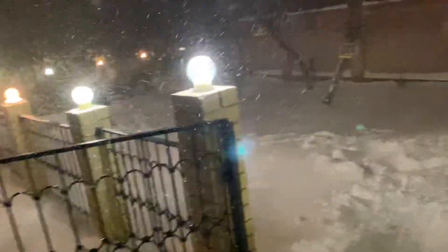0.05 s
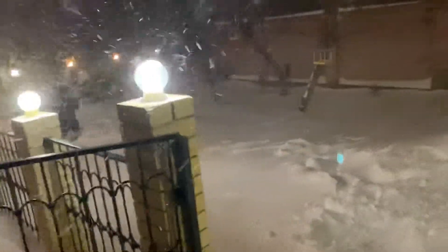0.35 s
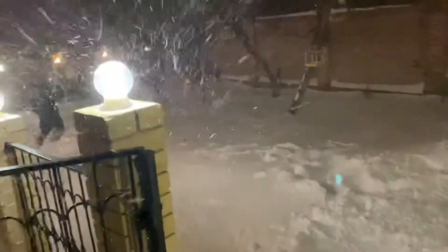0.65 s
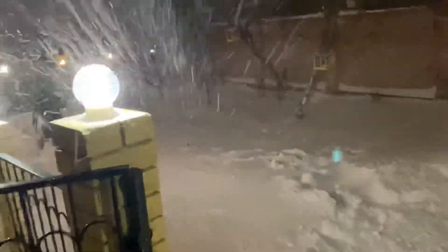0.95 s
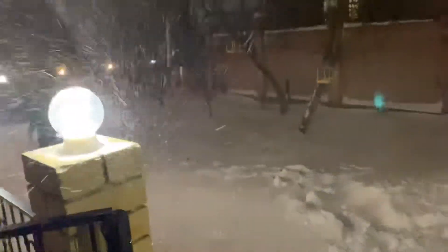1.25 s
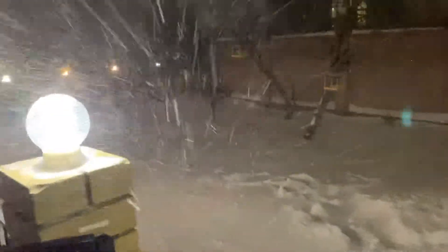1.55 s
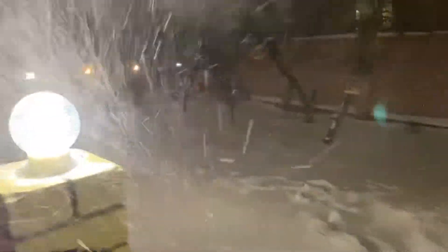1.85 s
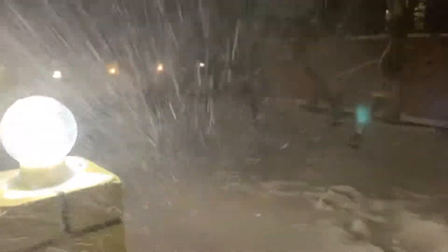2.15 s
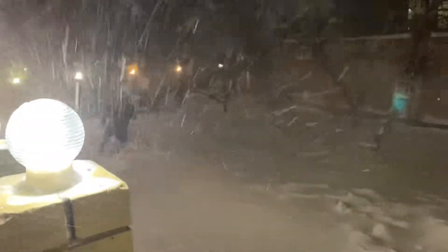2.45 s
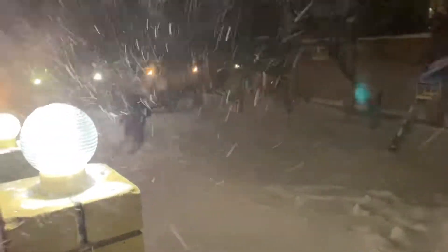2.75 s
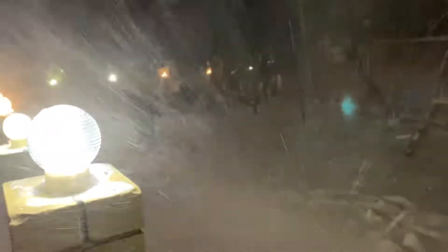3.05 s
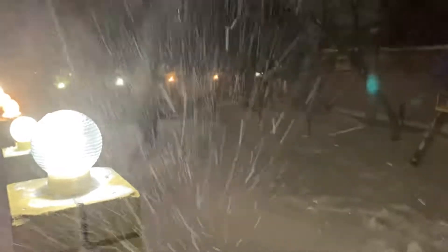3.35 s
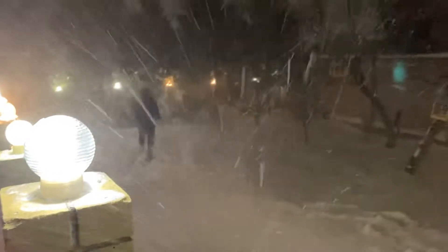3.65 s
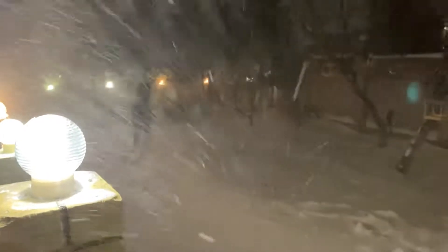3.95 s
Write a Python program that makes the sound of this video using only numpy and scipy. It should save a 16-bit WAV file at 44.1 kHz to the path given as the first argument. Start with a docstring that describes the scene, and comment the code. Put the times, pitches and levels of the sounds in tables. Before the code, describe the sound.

Wind buffets a hand-held microphone outdoors in a snowstorm. It starts as a low rumble with a few thumps, then builds into rapid, rasping gusts that ease near the end. Blowing snow hisses faintly behind.

```python
"""Snowstorm gusts blow across the two microphone openings (ports) of a hand-held recorder outdoors.
Slow swirls of air (eddies) rumble, and gusts strike in throaty, rasping bursts.
Single eddies slap and thump the ports. Driven snow hisses over the far storm,
one flake ticks on the case, and a limiter holds down the hardest jolts."""
import sys
import numpy as np
from scipy import signal
from scipy.fft import rfft, irfft
from scipy.io import wavfile
from scipy.ndimage import uniform_filter1d, minimum_filter1d, map_coordinates

SR = 44100
rng = np.random.default_rng(int(sys.argv[2]) if len(sys.argv) > 2 else 0)


def pcm_store(signal):
    """Save signal as 16-bit PCM."""
    levels = np.round(np.clip(np.atleast_2d(signal), -1, 1) * 32767)
    wavfile.write(sys.argv[1], SR, levels.astype(np.int16).T)


N = 176400

STRONG_RUSH_DB, STRONG_TREBLE_DB, STRONG_RUMBLE_DB = -21, -38, -18  # what counts as a strong gust
RUMBLE_EDGE_HZ, RUSH_EDGE_HZ = 51, 294  # the rumble hands over to the rush between these
PORT_LAG_S = 0.00024  # the left port feels an eddy this much later
SHADE_HZ = 1720  # the case shades the far port above this
LEFT_MINUS_RIGHT = np.array([[.5], [-.5]])  # splits a level difference between the ports


def wind():
    """Gusts drive eddies across the ports: big ones rumble, middling ones rush, fine ones rasp."""
    # How loud the rumble is. Each row: time in seconds, level in dB.
    rumble_levels = [(0.02, -29), (0.27, -41.5), (0.37, -24), (0.45, -45), (0.47, -25.5), (0.64, -18),
                     (0.69, -30), (0.73, -16), (1.03, -24), (1.09, -20), (1.19, -28.5), (1.22, -16),
                     (1.96, -15), (1.99, -22), (2.17, -22.5), (2.26, -12.5), (2.31, -26), (2.7, -22),
                     (2.86, -14), (3.27, -17.5), (3.95, -25)]
    # The tone of the eddies in a strong gust. Each row: frequency in Hz, level in dB.
    eddy_colour = [(25, -9), (35, -55), (50, 14.5), (110, 12), (200, 3.5), (400, 1.5), (750, 0), (1100, -5),
                   (1500, -11), (2100, -19), (3000, -34), (6400, -47)]
    flutter_db = 2.03 * smooth_random(per_s=68)
    rush_db, treble_db = gusts()
    rumble_db = over_time(rumble_levels) - STRONG_RUMBLE_DB - 1.5
    out = np.array([vortices(rush_db), vortices(rush_db)])
    swarm = eddies()
    for hz in 25 * 2 ** (np.arange(17) / 2):
        flow_share = over_pitch([(RUMBLE_EDGE_HZ, 0), (RUSH_EDGE_HZ, 1)], hz)
        treble_share = over_pitch([(650, 0), (1850, 1)], hz)
        gust_db = (1 - treble_share) * rush_db + treble_share * treble_db - 1
        flow_db = gust_db + flutter_db + 2.2 * smooth_random(per_s=55)  # each band also flickers alone
        band_db = STRONG_RUSH_DB + flow_share * flow_db + (1 - flow_share) * rumble_db
        side_db = LEFT_MINUS_RIGHT * 0.5 * min(hz / SHADE_HZ, 1)  # the left catches more fine eddies
        colour = undb(over_pitch(eddy_colour, hz) + side_db) * np.sqrt(hz / 1300)
        out = out + colour * undb(band_db) * half_octave(swarm, hz)
    return out


def gusts():
    """Each gust strikes, holds and eases off. Gives rush and treble in dB, where 0 is a strong gust."""
    # The gusts. Each row: start in seconds, hold in seconds, rush level in dB, treble level in dB.
    strikes = [(.315, 0.079, -27, -68), (0.492, 0.067, -27.5, -59.5), (.6, 0.085, -25.5, -53.5),
               (0.791, .11, -22.5, -38.5), (0.957, 0.034, -22.5, -39.5), (1.043, 0.046, -19, -37.5),
               (1.15, 0.084, -27.5, -42.5), (1.34, 0.12, -16.5, -31.5), (1.481, .04, -19.5, -37.5),
               (1.586, 0.083, -22, -39), (1.738, 0.017, -19.5, -36), (1.88, .13, -23, -40.5),
               (2.081, .075, -22, -53.5), (2.218, 0.049, -18, -37.5), (2.411, 0.019, -19, -40),
               (2.469, 0.025, -20, -31), (2.532, 0.072, -23.5, -36), (2.617, 0.025, -18, -38.5),
               (2.737, 0.12, -19, -33.5), (2.917, 0.0413, -17.5, -32), (3.02, 0.036, -18.5, -35.5),
               (3.088, 0.031, -16, -30), (3.182, 0.051, -20.5, -34.5), (3.29, 0.071, -20, -35.5),
               (3.422, .015, -20, -35), (3.526, 0.081, -28, -50), (3.713, 0.063, -26.5, -50.5),
               (3.892, 0.073, -23, -44.5)]
    # The wind between gusts. Each row: time in seconds, rush level in dB, treble level in dB.
    lull = [(.22, -54.5, -86), (.45, -39.5, -73), (.75, -27.5, -45.5), (1.3, -28, -49.5), (2.38, -31, -52),
            (2.9, -25.5, -41.5), (3.4, -25.5, -45), (3.48, -35, -50.5), (3.83, -39.5, -64), (4, -34, -62.5)]
    rise_db_per_s, fall_db_per_s = 649.5, 340
    t = np.arange(N) / SR
    rush_db, treble_db = over_time(lull, column=1), over_time(lull, column=2)
    for start, hold, top_rush_db, top_treble_db in strikes:
        strength = undb(top_rush_db - STRONG_RUSH_DB)  # weaker gusts swell more slowly
        before_db = rise_db_per_s * strength * np.maximum(start - t, 0)
        after_db = fall_db_per_s * np.maximum(t - start - hold, 0)
        rush_db = np.maximum(rush_db, top_rush_db - before_db - after_db)
        treble_db = np.maximum(treble_db, top_treble_db - before_db - after_db)
    return rush_db - STRONG_RUSH_DB, treble_db - STRONG_TREBLE_DB


def eddies():
    """A swarm of tiny, ragged pressure jolts, partly shared by the two ports. Gives their spectrum."""
    # How much of the swirling both ports feel. Each row: frequency in Hz, share from 0 to 1.
    shared_by_ports = [(40, 0.88), (200, 0.57), (700, 0.43), (3000, 0)]
    eddies_per_s, spread_db, decay_s, smooth_share = 480, 15, .0014, .24
    f = np.arange(1, N // 2 + 2) * SR / N
    sizes = (rng.random(N) < eddies_per_s / SR) * undb(-spread_db * rng.random(N))
    power = signal.lfilter([1], [1, -np.exp(-2 / (decay_s * SR))], sizes ** 2)  # each jolt dies away
    loudness = np.sqrt(power / power.mean() + smooth_share)
    right, left_only = rfft(rng.standard_normal((2, N)) * loudness)
    shared = np.clip(over_pitch(shared_by_ports, f), 0, 1)
    left = shared * right + np.sqrt(1 - shared ** 2) * left_only
    lag_s = PORT_LAG_S + 0.00064 / (1 + (f / 310) ** 2)  # the left lags more in the bass
    left *= np.exp(-2j * np.pi * f * lag_s)
    return np.array([left, right]) * late_bass(f, cycles=0.6)


def vortices(rush_db):
    """Little whirls peel off a port's rim: a hollow, unsteady note that climbs as the wind grows."""
    centre_hz, db_per_octave, wander_octaves = 563, 22, .55
    hz = centre_hz * 2 ** (rush_db / db_per_octave + wander_octaves * smooth_random(per_s=28))
    wobble = smooth_random(per_s=110) + 1j * smooth_random(per_s=110)  # blurs the note into a band
    note = np.real(wobble * np.exp(2j * np.pi * np.cumsum(hz) / SR))
    return undb(rush_db - 27) * note / np.hypot(1, hz / (2 * centre_hz))  # high notes are softer


def buffets():
    """One eddy hits the ports: a jolt with a ragged wake. The treble cracks, then the bass thumps."""
    # Single hits. Each row: time in seconds, strength in dB, frequency in Hz above which it fades,
    # and left minus right level of the treble in dB.
    hits = [(0.111, -17, 332, 5), (0.174, -17.5, 172, -2), (0.358, -1.5, 228, 0), (0.462, -5.5, 270, 0),
            (.493, -4, 260, -3), (0.608, -6.5, 800, 11), (.621, 3.5, 282, 10), (.675, -7.5, 1390, 8),
            (0.717, 3, 1570, 11), (0.732, 0, 880, -1), (1.088, 4, 525, 4), (1.402, -0.5, 1100, 0.5),
            (1.661, 0, 2350, 0), (1.871, -2, 1381, -18), (1.906, -10.5, 1476, -27), (2.083, -10.5, 865, -4),
            (2.168, 6, 1432, 6), (2.183, -2.5, 1478, 24), (2.221, -14.5, 3060, 19), (2.241, -1, 1230, 27),
            (2.49, -1, 2500, 12), (2.533, -7, 2330, -14), (2.604, -3.5, 1933, 8), (2.628, 2, 570, -5),
            (2.962, -11.5, 2676, 14.5), (3.048, -3, 1610, 20), (3.087, -11.5, 2129, 10), (3.114, 3, 800, 2),
            (3.208, -6, 2130, -12), (3.239, -1, 3260, 17), (3.309, -9, 2812, 17), (3.432, 6, 1180, 20.5),
            (3.444, -5, 3500, 2), (3.501, -5, 1754, 0), (3.712, -5, 1048, 20)]
    bass_hz, bass_slope, edge_slope = 85, 0.9, 3.29
    wake_decay_s, wake_strength = 0.0018, 1.44
    size = 8192
    f = np.arange(1, size // 2 + 2) * SR / size
    wake = np.exp(-np.arange(size) / SR / wake_decay_s)
    wake *= wake_strength / np.sqrt(np.sum(wake ** 2))
    body = (bass_hz / f) ** bass_slope / np.sqrt(1 + (bass_hz / f) ** 6)  # a hump in the bass
    body = body * late_bass(f, cycles=0.806) * SR / (2 * np.pi * bass_hz)
    treble_share = f ** 2 / (f ** 2 + SHADE_HZ ** 2)
    lead, fade = size // 8, signal.windows.tukey(size, .2)
    out = np.zeros((2, N + size))
    for start, db, edge_hz, side_db in hits:
        clean_jolt = np.exp(2j * np.pi * rng.random())
        jolt = clean_jolt + rfft(wake * rng.standard_normal((2, size))) * f / (f + RUSH_EDGE_HZ)
        jolt[0] *= np.exp(-2j * np.pi * f * PORT_LAG_S)
        gain = undb(db + 3 + LEFT_MINUS_RIGHT * side_db * treble_share)
        gain /= np.sqrt(1 + (f / edge_hz) ** (2 * edge_slope))
        thump = irfft(jolt * body * gain, size)
        i = int(start * SR) - lead
        out[:, i:i + size] += np.roll(thump, lead, axis=1) * fade
    return out[:, :N]


def flake_tick():
    """An icy flake strikes the case near the right port."""
    start_s, ring_hz, decay_s = .3755, 4330, 0.0017
    age = np.arange(N) / SR - start_s
    ring = hiss(ring_hz) + 0.18 * hiss(1.44 * ring_hz)
    return ring * (age > 0) * np.exp(-np.abs(age) / decay_s) * undb([[-33.5], [-28.5]])


def snow():
    """Driven snow hisses louder as a cloud of it passes, over the even rush of the far storm."""
    # How loud the blowing snow is. Each row: time in seconds, level in dB.
    snow_levels = [(0, -85), (.5, -76.5), (.95, -71.5), (1.5, -58), (2.15, -63.5), (2.8, -67),
                   (3.45, -71.5), (3.8, -62), (4, -68)]
    # The tone of the blowing snow. Each row: frequency in Hz, level in dB.
    snow_colour = [(2000, 1), (4500, 2), (7000, 3.5), (11000, -.5), (16000, -3.5)]
    # The tone of the far storm. Each row: frequency in Hz, level in dB.
    storm_colour = [(350, 0), (2200, 11), (4000, 7), (10000, -3)]
    cloud_db, storm_db = over_time(snow_levels) + 2.5, -68.5
    out = 0
    for hz in 350 * 2 ** (np.arange(12) / 2):
        flicker_db = .4 * smooth_random(per_s=42)
        near = undb(cloud_db + over_pitch(snow_colour, hz) + flicker_db)
        far = undb(storm_db + over_pitch(storm_colour, hz))
        out = out + np.hypot(near, far) * np.sqrt(hz / 7000) * hiss(hz)
    return out


def undb(db):
    """Turns decibels into a number to multiply by."""
    return 10 ** (np.asarray(db) / 20)


def over_time(table, column=1):
    """One column of a table, joined by straight lines in time."""
    rows = np.array(table)
    return np.interp(np.arange(N) / SR, rows[:, 0], rows[:, column])


def over_pitch(table, hz):
    """Reads a table at a frequency, with the octaves evenly spaced."""
    rows = np.array(table)
    return np.interp(np.log(hz), np.log(rows[:, 0]), rows[:, 1])


def smooth_random(per_s):
    """A smooth random curve, about 1 in size, with per_s new values a second."""
    coarse = np.arange(0, N, 20)
    y = map_coordinates(rng.standard_normal(N // 20), [coarse / SR * per_s], order=2, mode="mirror")
    return np.interp(np.arange(N), coarse, y / y.std())


def late_bass(f, cycles):
    """Delays each frequency by the same number of its own cycles, so the bass comes last."""
    return np.exp(-2j * np.pi * cycles * np.log(f))


def half_octave(spectrum, hz):
    """One half-octave band of a spectrum, as a sound about 1 in size."""
    f = np.arange(1, N // 2 + 2) * SR / N
    distance = np.clip(2 * np.log2(f / hz), -1, 1)
    y = irfft(spectrum * np.cos(np.pi / 2 * distance) ** 2, N)
    return y / y.std()


def hiss(hz):
    """Half an octave of noise, unrelated at the two ports."""
    return half_octave(rfft(rng.standard_normal((2, N))), hz)


def scene():
    """Wind on the microphone in front of the blowing snow."""
    return wind() + buffets() + snow() + flake_tick()


def record(dry):
    """A fast limiter turns down the hardest jolts, then the highest treble is cut."""
    ceiling, reaction_s, top_hz = 0.99, 0.0021, 15900
    span = int(reaction_s * SR)
    peak = np.abs(dry).max(axis=0)
    gain = minimum_filter1d(ceiling / np.maximum(peak, ceiling), 2 * span)
    smooth_gain = uniform_filter1d(uniform_filter1d(gain, span), span)
    treble_cut = signal.ellip(10, .2, 80, top_hz, fs=SR, output="sos")
    return signal.sosfilt(treble_cut, dry * smooth_gain)


dry = scene()
out = record(dry)
pcm_store(out)
```